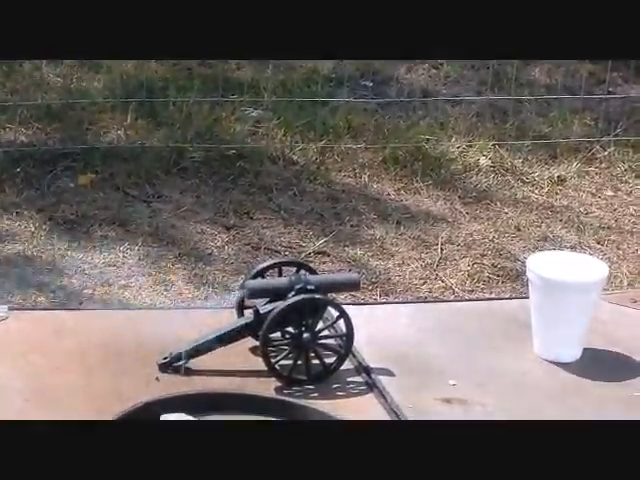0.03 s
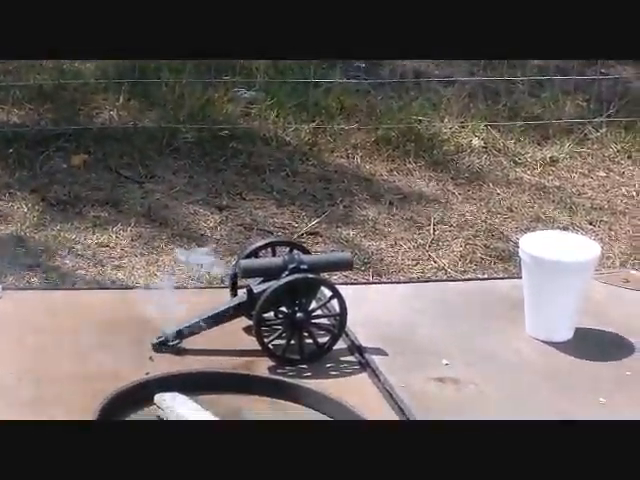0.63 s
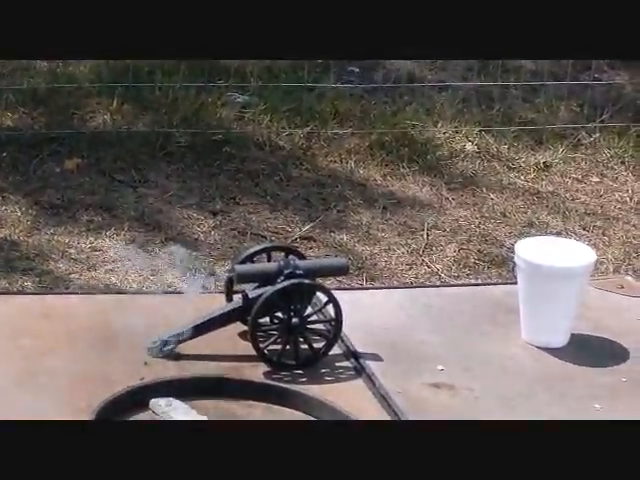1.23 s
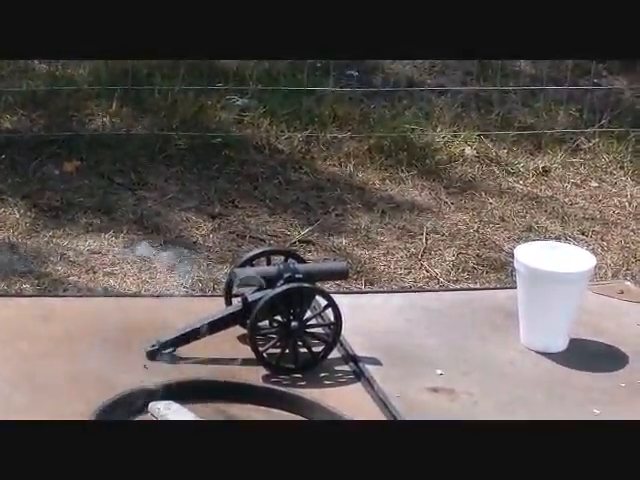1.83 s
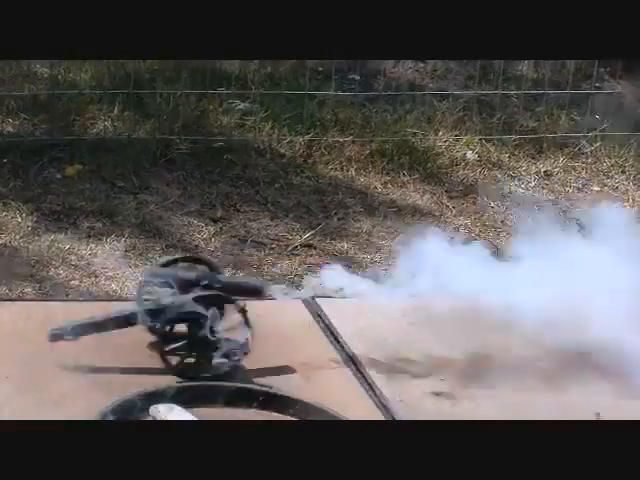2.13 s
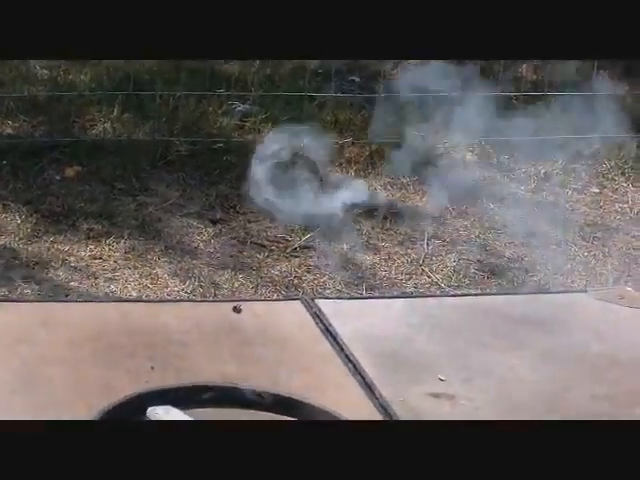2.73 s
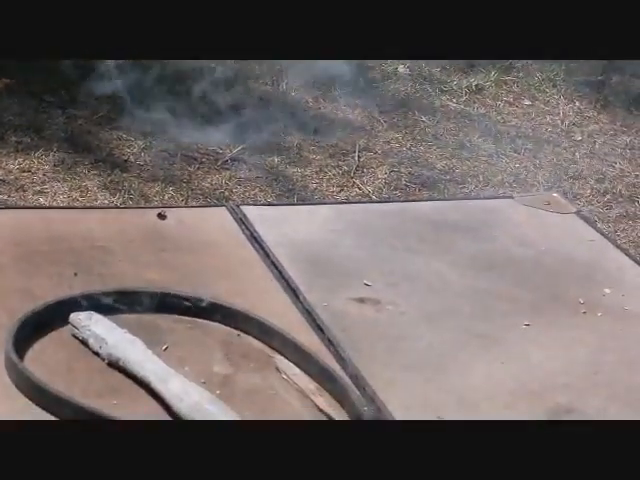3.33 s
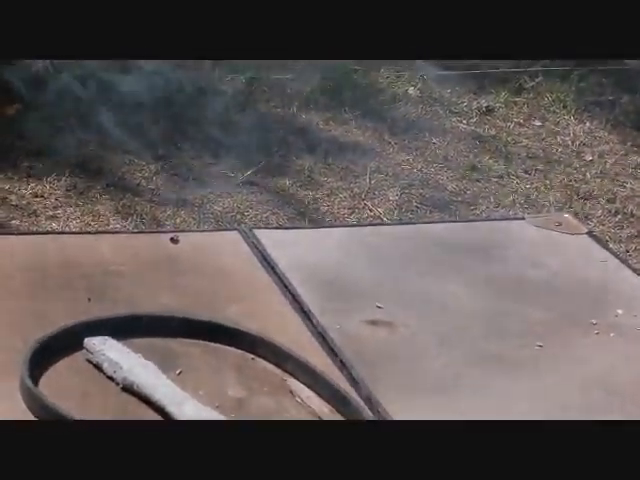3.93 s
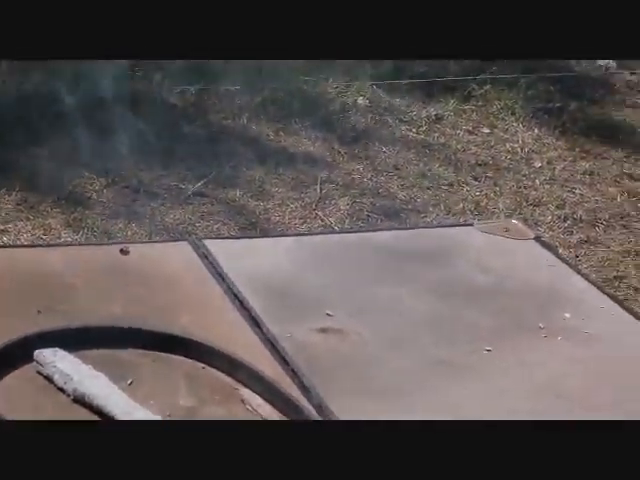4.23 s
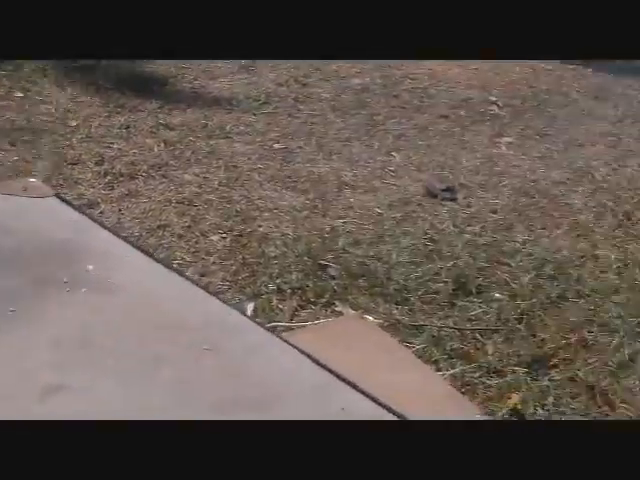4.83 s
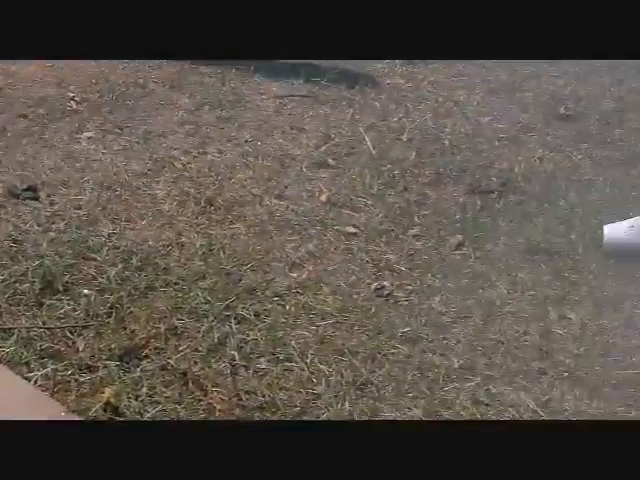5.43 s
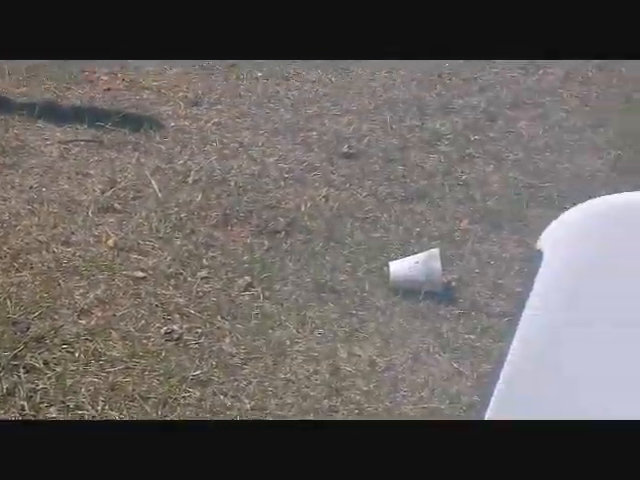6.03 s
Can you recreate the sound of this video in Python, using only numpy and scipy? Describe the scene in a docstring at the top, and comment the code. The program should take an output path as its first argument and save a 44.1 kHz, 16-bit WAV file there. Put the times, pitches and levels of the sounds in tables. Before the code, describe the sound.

A fuse fizzes outdoors, then a small cannon fires with a sharp, echoing bang and crashes over, amid faint birdsong and fan hum.

```python
"""A fan unit hums in a yard while a fuse hisses and spits on a small black-powder cannon; birds call.
The shot overloads the microphone and echoes off walls and fences. Debris pops, and the cannon, thrown
off its platform by the recoil, crashes down and tumbles with a crunch and a short ring of iron.
Gain control ducks the yard, which slowly swells back with birdsong and two soft scuffs in dry grass."""
import sys
import numpy as np
from scipy import signal
from scipy.fft import rfft, irfft
from scipy.io import wavfile
from scipy.ndimage import minimum_filter1d

SR = 44100
rng = np.random.default_rng(int(sys.argv[2]) if len(sys.argv) > 2 else 0)


def wav_record(signal):
    """Record a signal, one row per channel, as 16-bit PCM in the file named by sys.argv[1]."""
    frames = np.transpose(np.atleast_2d(signal))
    bounded = np.clip(frames, -1, 1)
    # unit amplitude maps onto the largest positive 16-bit level
    quanta = np.round(bounded * 32767).astype(np.int16)
    wavfile.write(sys.argv[1], SR, quanta)


N = 268128
TIME = np.arange(N) / SR
FIRE_S = 2.2128  # the charge catches

# bright hiss of burning powder and dry grass: f/Hz, relative level/dB
HISS_COLOUR = [(300, -20.5), (1200, 1), (2500, 4.5), (5000, -0.5), (9500, -11), (11500, -16.5),
               (16000, -22)]
# body of the muzzle jet and its echoes: f/Hz, relative level/dB
BOOM_COLOUR = [(25, 1.5), (40, -4), (65, -11.5), (100, 0.5), (220, -2), (340, 3.5), (700, -7), (1100, 1.5),
               (2200, -9.5), (5000, -15), (9000, -21.5), (12000, -30), (16000, -36.5)]


def amp(db):
    return 10 ** (np.asarray(db) / 20)


def unit_rms(x):
    return x / np.sqrt(np.mean(x ** 2) + 1e-20)


def value_at(points, hz):
    """A curve's value at hz, on a log-frequency axis."""
    f, value = np.transpose(points)
    return np.interp(np.log(hz + 1), np.log(f + 1), value)


def fade(t, t60):
    """Exponential decay, 60 dB down at t60 seconds."""
    return np.exp(-np.log(1000) * t / np.maximum(t60, 1e-3))


def add(mix, s, sound):
    """Lays a sound into the mix at s seconds."""
    part = mix[max(round(s * SR), 0):][:len(sound)]
    part += sound[:len(part)]


def noise(colour, size):
    """Noise of rms 1 with a given spectrum."""
    hz = np.fft.rfftfreq(size, 1 / SR)
    return unit_rms(irfft(rfft(rng.standard_normal(size)) * amp(value_at(colour, hz)), size))


def drift(rate_hz):
    """A random wander of rms 1, rolling off above rate_hz."""
    lowpass = np.exp(-(np.fft.rfftfreq(N, 1 / SR) / rate_hz) ** 2)
    return unit_rms(irfft(rfft(rng.standard_normal(N)) * lowpass, N))


def coloured(x, colour, tilt_db):
    """Minimum-phase EQ of unit power, tilted by tilt_db per octave above 300 Hz."""
    hz = abs(np.fft.fftfreq(4096, 1 / SR))
    gain = amp(value_at(colour, hz) + tilt_db * np.log2(np.maximum(hz, 300)))
    spectrum = np.exp(np.conj(signal.hilbert(np.log(gain))))
    response = np.fft.ifft(spectrum).real[:len(hz) // 2]
    return signal.oaconvolve(x, response / np.linalg.norm(response))[:len(x)]


def burst(colour, rise_s, t60, tilt_db=0):
    """Half a second of coloured noise that swells and then decays."""
    t = TIME[:SR // 2]
    envelope = np.minimum(t / rise_s, 1) * fade(np.maximum(t - rise_s, 0), t60)
    return coloured(rng.standard_normal(len(t)) * envelope, colour, tilt_db)


def reverb(x, tail):
    """The wet signal: x through a tail scaled to unit energy."""
    return signal.fftconvolve(x, tail / np.linalg.norm(tail))[:N]


def fan(air_db=-32, swell_db=0.7, waver=0.12, wander_hz=0.83):
    """Wavering motor tones and a ringing casing over a rush of air."""
    # fan and motor tones: f/Hz, level/dB
    motor_tones = [(59.2, -46), (118.4, -44), (186, -44.5), (279.9, -36.5), (441.4, -45.5), (635.2, -63),
                   (748.3, -45)]
    # casing resonances, stirred by the air: f/Hz, width/Hz, level/dB
    casing_modes = [(281.2, 15, -38.5), (332.7, 31, -39), (690, 8.9, -51.5), (993, 27, -53),
                    (1073, 20, -56), (1317, 6.9, -66), (1490, 6, -64.5), (1600, 4.2, -62), (1674, 6, -62.5),
                    (2806, 87, -62), (3160, 30, -63)]
    # rush of the fan and the open air: f/Hz, relative level/dB
    air_colour = [(25, -32), (45, -17), (95, -6), (145, -13), (200, -5), (270, -1), (390, -13), (520, -6),
                  (850, -17.5), (1800, -28.5), (3800, -35.5), (9500, -44.5), (11000, -49), (16000, -56)]
    hum = np.zeros(N)
    for hz, db in motor_tones:
        level = amp(db) * (1 + waver * drift(16))
        hum += level * np.sin(2 * np.pi * np.cumsum(hz + wander_hz * drift(3.5)) / SR)
    casing = sum(amp(db) * drift(width) * np.sin(2 * np.pi * hz * TIME) for hz, width, db in casing_modes)
    rush = amp(air_db + swell_db * drift(4.2)) * noise(air_colour, N)
    return np.sqrt(2) * (hum + casing) + rush


def fuse(burn_db=-54.5, flutter_db=2.0, sparks_per_s=350, spark_db=14):
    """Powder fizzes, throws tiny sparks, spits and flares until the charge catches."""
    # sharp spits: t/s, level/dB
    spits = [(0.1, -37.5), (.275, -38), (.371, -36.5), (0.388, -43), (0.831, -35)]
    # longer flares of the powder: t/s, level/dB, t60/s
    flares = [(.21, -51.5, 1.4), (0.524, -47, 0.1), (1.26, -52, 1.2)]
    sparks = (rng.random(N) < sparks_per_s / SR) * rng.standard_normal(N)
    fizz = noise(HISS_COLOUR, N) + amp(spark_db) * coloured(sparks, HISS_COLOUR, tilt_db=1.5)
    out = amp(burn_db + flutter_db * drift(35)) * fizz * (TIME < FIRE_S)
    for s, db in spits:
        add(out, s, amp(db) * burst(HISS_COLOUR, rise_s=0.0014, t60=0.038, tilt_db=-6))
    for s, db, t60 in flares:
        add(out, s, amp(db) * burst(HISS_COLOUR, rise_s=0.013, t60=t60, tilt_db=2))
    return out


def sing(calls, notes, bend, quaver=0.0044):
    """Repeats a syllable of gliding whistles; a positive bend glides fast at first, then levels off."""
    out, pitch = np.zeros(N), 1 + quaver * drift(150)
    for s, db in calls:
        for delay, length, start_hz, end_hz, note_db in notes:
            u = np.linspace(0, 1, int(length * SR))
            glide = u + bend * u * (1 - u)
            hz = (start_hz + (end_hz - start_hz) * glide) * pitch[int(s * SR):][:len(u)]
            envelope = amp(db + note_db) * np.sqrt(abs(np.sin(np.pi * u)))
            add(out, s + delay, envelope * np.sin(2 * np.pi * np.cumsum(hz) / SR))
    return out


def through_trees(x, blur_db, t60):
    """A distant call with its scatter off the leaves."""
    leaves = rng.standard_normal(SR) * fade(TIME[:SR], t60)
    return x + amp(blur_db) * reverb(x, leaves)


def birds(run_hz=3000, step_hz=105, sag_hz=190, spacing_s=.084, note_s=.068):
    """One bird whistles slurs, pips, runs and couplets; another throws in quick rising chips."""
    # syllables, a row a note: delay/s, length/s, start f/Hz, end f/Hz, relative level/dB
    slur = [(0, .042, 3680, 4420, -2), (.08, .078, 4300, 2930, .5)]
    chip = [(0, .022, 5600, 8100, 0)]
    pip = [(0.0018, .048, 2700, 2810, 0)]
    couplet = [(0, 0.037, 3500, 3120, -5), (.052, 0.032, 3650, 4000, -1.5)]
    # cues for each syllable: t/s, relative level/dB
    slur_cues = [(.495, -54.5), (.715, -57.5), (.947, -55), (1.19, -56.5), (1.445, -50), (1.693, -52.5),
                 (1.958, -55), (3.352, -53)]
    chip_cues = [(.71, -46), (1.877, -48), (3.401, -47), (4.726, -47)]
    pip_cues = [(1.62, -50.5), (1.957, -49.5), (5.055, -56)]
    run_cues = [(3.716, -51), (4.071, -48.5)]
    couplet_cues = [(4.925, -50.5), (5.2, -49.5), (5.472, -53)]
    steps = run_hz - step_hz * np.arange(3)  # a run: three sagging notes, each a step lower
    run = [(k * spacing_s, note_s, hz, hz - sag_hz, 0) for k, hz in enumerate(steps)]
    song = sing(slur_cues, slur, bend=0.51) + sing(pip_cues, pip, bend=0.36)
    song += sing(run_cues, run, bend=-2.5) + sing(couplet_cues, couplet, bend=.1)
    chips = sing(chip_cues, chip, bend=.35)
    song = through_trees(song, blur_db=-5, t60=.22)
    chips = through_trees(chips, blur_db=1, t60=.25)
    return amp(3) * song + amp(.7) * chips


def blast_wave(push_s, ragged=0.11):
    """A ragged push of air, then a longer suction."""
    t = TIME[:SR // 10]
    wave = (1 - t / push_s + ragged * rng.standard_normal(len(t))) * np.exp(-t / push_s)
    return np.convolve(wave, np.hanning(7) / 3)  # rounds off the front


def shot(blast_db=1.5, jet_db=15, slap_db=25.5, slap_loss_db=3.5, slap_gap_s=.00255, thump_db=7):
    """The blast wave, the muzzle's gas jet, a train of slaps and the slow thump of swelling smoke."""
    out = np.zeros(N)
    add(out, FIRE_S, amp(blast_db) * blast_wave(push_s=0.00056))
    add(out, FIRE_S, amp(jet_db) * burst(BOOM_COLOUR, rise_s=0.000099, t60=0.013, tilt_db=1.5))
    # the blast slaps back off the platform and nearby things, weaker each time
    for k, jitter_s in enumerate(.0002 * rng.standard_normal(7)):
        s = FIRE_S + .0022 + k * slap_gap_s + jitter_s
        add(out, s, amp(slap_db - k * slap_loss_db) * blast_wave(push_s=.0006))
    u = (TIME - FIRE_S - 0.015) / .0075  # the thump: one slow cycle, centred 15 ms after firing
    return out - amp(thump_db) * u * np.exp(-u ** 2)


def yard_tail(rise_s):
    """Diffuse echo of the yard; the mids outlast the treble."""
    # the yard's reverb: f/Hz, relative level/dB, t60/s
    yard_bands = [(30, -29.5, .4), (120, 2, 1.2), (262.3, 6, 0.81), (600, -13, 1), (1300, -1.5, 1.3),
                  (2000, -3, 1.1), (2655, 1.5, 0.96), (3770, -7, 0.91), (9000, -4.5, 0.41),
                  (12500, -20, .55), (16000, -24, .5)]
    hz, db, t60 = np.transpose(yard_bands)
    f, t, bands = signal.stft(noise(np.c_[hz, db], SR * 2), SR, nperseg=512)
    decay = fade(t, value_at(np.c_[hz, t60], f)[:, None])
    tail = signal.istft(bands * decay, SR, nperseg=512)[1]
    return tail * np.minimum(TIME[:len(tail)] / rise_s, 1)


def echoes(first_db=10.5, loss_per_doubling_db=6, near_db=7.5, far_db=-25, tail_db=-3, patchy_db=0.96):
    """The yard answers the shot: distinct echoes, a bright near wash, a faint far one and a long tail."""
    # echoes off walls and fences, weaker the longer their path: t/s, tilt/(dB per octave)
    reflections = [(2.228, -0.5), (2.272, 1), (2.291, 1), (2.367, 0.5), (2.386, 0)]
    out, first_delay = np.zeros(N), reflections[0][0] - FIRE_S
    for s, tilt_db in reflections:
        db = first_db - loss_per_doubling_db * np.log2((s - FIRE_S) / first_delay)
        add(out, s, amp(db) * burst(BOOM_COLOUR, rise_s=0.0025, t60=0.086, tilt_db=tilt_db))
    add(out, FIRE_S + .024, amp(near_db) * burst(BOOM_COLOUR, rise_s=.014, t60=0.084, tilt_db=2.6))
    add(out, FIRE_S + .247, amp(far_db) * burst(BOOM_COLOUR, rise_s=0.027, t60=0.63, tilt_db=0.3))
    tail = yard_tail(rise_s=0.072)
    uneven_db = patchy_db * drift(60)[:len(tail)]  # scattered trees answer unevenly
    add(out, FIRE_S, tail * amp(tail_db + uneven_db))
    return out


def debris(width_cycles=0.55, ground_gain=0.61, ground_delay_s=.00085):
    """Falling debris: pops of about one cycle, each followed at once by its reflection off the ground."""
    # small hollow pops: t/s, peak level/dB, f/Hz
    pops = [(2.5258, 0.5, 1530), (2.678, 2, 1410)]
    out, t = np.zeros(N), np.arange(-SR // 200, SR // 200) / SR
    for s, db, hz in pops:
        pop = amp(db) * np.cos(2 * np.pi * hz * t) * np.exp(-(hz * t / width_cycles) ** 2)
        add(out, s + t[0], pop)
        add(out, s + t[0] + ground_delay_s, ground_gain * pop)
    return out


def in_yard(x, near_db, near_t60, far_db):
    """A sound with its quick scatter off nearby things and the yard's faint answer."""
    near = rng.standard_normal(SR) * fade(TIME[:SR], near_t60)
    far = yard_tail(rise_s=0.013)
    return x + amp(near_db) * reverb(x, near) + amp(far_db) * reverb(x, far)


def tumble(ring_db=-7, rattle_db=-15.5, low_cut_hz=85):
    """Each blow is a crunch on the ground, a damped ring of iron and the carriage's dull rattle."""
    # the cannon lands and tumbles: t/s, level/dB, tilt/(dB per octave)
    blows = [(2.561, -17, 1.5), (2.628, -19.5, 1), (2.7396, 4.5, -1.5), (2.7432, 8.5, 2.5),
             (2.757, -1.5, 4.5), (2.79, -10.5, 2), (2.847, -17, -5), (3.118, -12, -5), (3.1311, -13, 1),
             (3.214, -33.5, 6.5), (3.294, -22.5, 2)]
    # modes of the iron barrel and carriage: f/Hz, relative level/dB, t60/s
    iron_modes = [(157, -19, 0.12), (358, 2, 0.037), (788, -27.5, .035), (970, 8, 0.084),
                  (1110, -10, 0.031), (1594, 2, 0.041), (2150, -19, 0.035), (4700, -2, .025),
                  (5000, -17, 0.048), (6080, -3, 0.025), (7750, -39, 0.0393), (8700, -18, 0.062),
                  (11500, -26, .03)]
    # tone of the cannon against the ground: f/Hz, relative level/dB
    ground_colour = [(30, -36), (75, -10), (150, -3), (260, -10), (340, 4.5), (590, -4), (780, 2),
                     (1000, 0), (1800, -2.5), (3000, -13.5), (6500, -23.5), (10500, -28.5), (16000, -49)]
    # scrapes as it rolls over: t/s, level/dB, t60/s
    scrapes = [(3.135, -20.5, 0.5), (3.237, -19.5, 0.28)]
    out, t = np.zeros(N), TIME[:SR // 2]
    hz, mode_db, mode_t60 = np.transpose(iron_modes)[:, :, None]
    for s, db, tilt_db in blows:
        share = amp(mode_db + tilt_db * np.log2(hz))
        struck = rng.choice([-1, 1], hz.shape) * share / np.linalg.norm(share)
        ring = (struck * fade(t, mode_t60) * np.sin(2 * np.pi * hz * t)).sum(0)
        crunch = burst(ground_colour, rise_s=0.00017, t60=0.034, tilt_db=tilt_db)
        rattle = burst(ground_colour, rise_s=0.0049, t60=0.1, tilt_db=-2.5)
        add(out, s, amp(db) * (crunch + amp(ring_db) * ring + amp(rattle_db) * rattle))
    for s, db, t60 in scrapes:
        add(out, s, amp(db) * burst(ground_colour, rise_s=0.0012, t60=t60, tilt_db=-4))
    # the tumble carries no deep bass
    radiated = signal.lfilter(*signal.butter(2, low_cut_hz, "high", fs=SR), out)
    return in_yard(radiated, near_db=-19.5, near_t60=0.29, far_db=-30)


def grass(grain_db=3.0):
    """Grainy swishes of dry blades."""
    # soft scuffs: t/s, level/dB, t60/s
    scuffs = [(4.3, -46, 0.45), (4.575, -42.5, 0.39)]
    out = np.zeros(N)
    for s, db, t60 in scuffs:
        add(out, s, amp(db) * burst(HISS_COLOUR, rise_s=0.053, t60=t60, tilt_db=-8))
    return out * amp(grain_db * drift(200))


def scene():
    """The yard and the cannon, mixed to mono."""
    return (fan() + fuse() + shot() + echoes() + tumble() + debris() + birds() + grass())[None]


def gain_control(x, threshold_db=-19, depth_db=17.5, attack_s=0.0013, hold_s=0.48, recover_db_per_s=4):
    """The gain dives on a loud sound, holds, then creeps back."""
    power_db = 10 * np.log10(signal.lfilter(np.ones(64) / 64, 1, x[0] ** 2) + 1e-12)
    over_db = np.clip(power_db - threshold_db, 0, depth_db)
    half = int(hold_s * SR / 2)
    held_db = -minimum_filter1d(-over_db, 2 * half + 1, origin=half, mode="constant")  # peak hold
    recovery_db = recover_db_per_s * TIME
    cut_db = np.maximum.accumulate(held_db + recovery_db) - recovery_db
    pole = np.exp(-1 / (attack_s * SR))
    return x * amp(-signal.lfilter([1 - pole], [1, -pole], cut_db))


def record(dry, headroom_db=16, ceiling=.95, high_cut_hz=15900):
    """The microphone saturates, gain control ducks, peaks clip and the top treble is cut."""
    saturated = amp(headroom_db) * np.tanh(dry / amp(headroom_db))
    clipped = np.clip(gain_control(saturated), -ceiling, ceiling)
    lowpass = signal.firwin(255, high_cut_hz, window=("kaiser", 8), fs=SR)
    return signal.oaconvolve(clipped, lowpass[None], "same")


dry = scene()
out = record(dry)
wav_record(out)
```